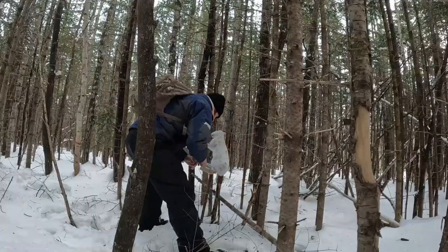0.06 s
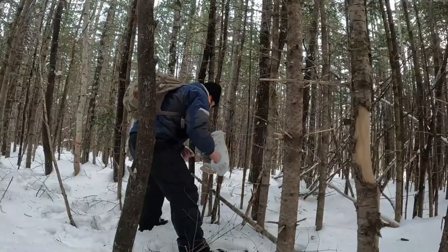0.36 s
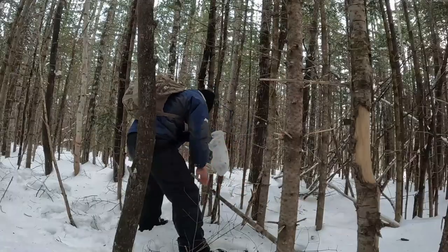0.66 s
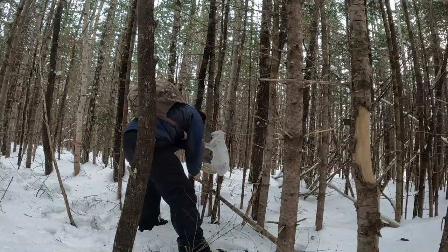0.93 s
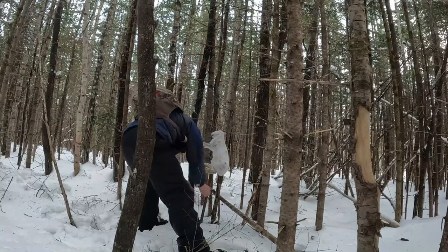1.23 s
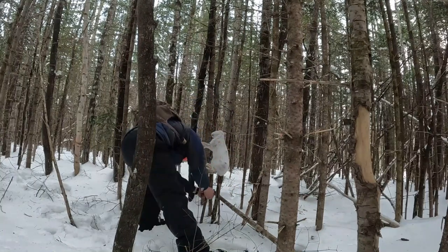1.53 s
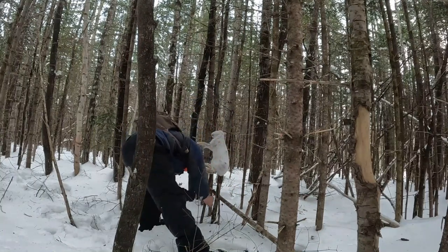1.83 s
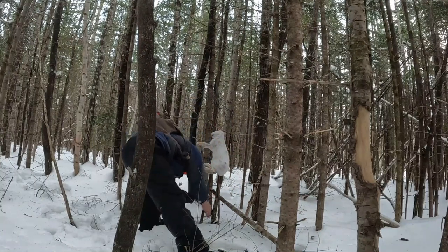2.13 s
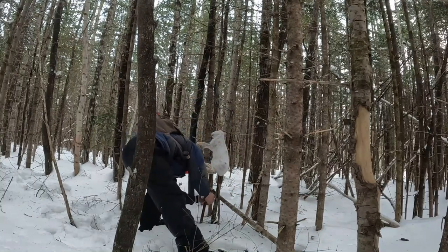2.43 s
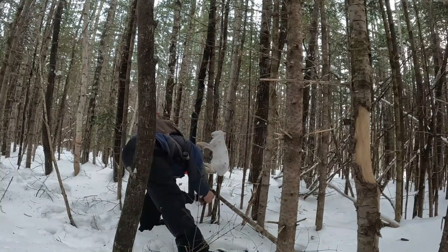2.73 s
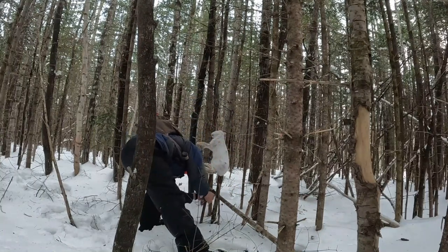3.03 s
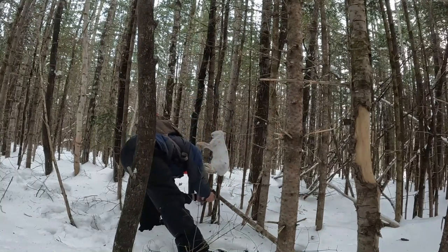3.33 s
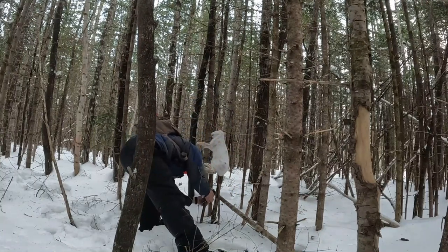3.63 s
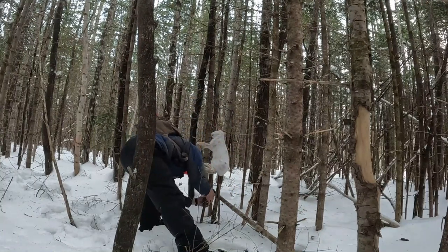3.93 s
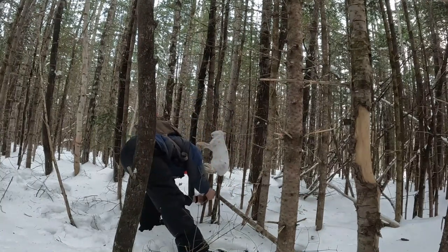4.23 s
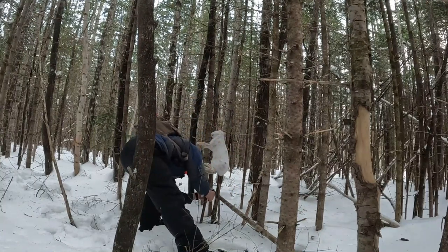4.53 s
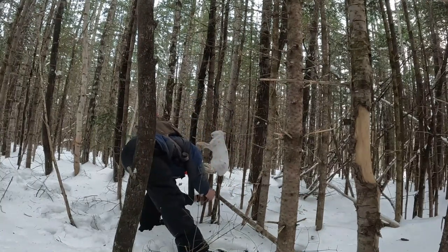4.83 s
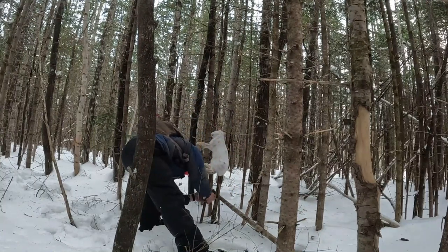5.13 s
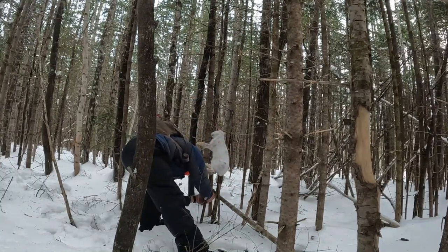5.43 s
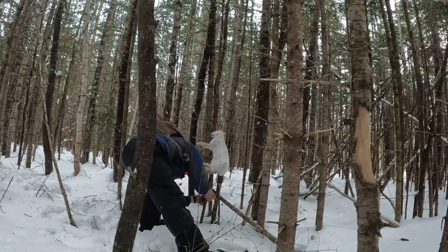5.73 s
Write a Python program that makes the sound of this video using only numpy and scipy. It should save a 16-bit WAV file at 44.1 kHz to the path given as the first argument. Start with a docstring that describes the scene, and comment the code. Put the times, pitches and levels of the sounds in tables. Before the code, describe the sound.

In quiet snowy woods, dry sticks knock lightly while sleeves rustle and boots press softly into snow. A twig then snaps, sharp and bright, echoing briefly among the trunks. Small dry ticks of wire on bark follow, with three very faint, high whistles. Near the end come another knock, more soft steps and a sudden cloth scrape. The handling sits near the centre, over a low air rumble and faint treetop hiss.

```python
"""A twig snaps sharply and echoes among the trunks as a wire snare is taken off a pole in a snowy wood.
The twig breaks fibre after fibre and sets its branch ringing. Dry sticks knock and ring, wire ticks
on bark, and countless tiny slips make sleeves rustle and snow crunch over the soft thump of boots.
Under it all lie a low rumble of moving air, a faint hiss of treetops and three thin, high whistles."""
import sys
import numpy as np
from scipy import signal
from scipy.fft import rfft, irfft, next_fast_len
from scipy.io import wavfile

SR = 44100
rng = np.random.default_rng(int(sys.argv[2]) if len(sys.argv) > 2 else 0)


def int16_out(signal):
    """Quantize to a 16-bit WAV file."""
    q = np.round(np.clip(np.atleast_2d(signal).T, -1, 1) * 32767)
    wavfile.write(sys.argv[1], SR, q.astype(np.int16))


N = 259440
TIME = np.arange(N) / SR

# how briskly the body moves, as a rustle envelope: (time [s], level [dB])
MOTION = [(0.0, -62.5), (0.44, -67.5), (0.61, -64.5), (0.74, -59.5), (0.89, -66.5), (1.18, -64.5),
          (1.51, -61), (1.72, -62), (2.16, -69.5), (2.59, -71), (3.4, -71), (3.66, -68), (4.28, -70),
          (5.17, -61.5), (5.32, -61.5), (5.82, -67)]
CALM_DB = -70   # the motion envelope when only the hands work
# weight going onto a boot: (time [s], hold [s], muffled snow [dB], deep thump [dB])
STEPS = [(0.0, 0.022, -49.5, -36.5), (0.671, 0.08, -48.5, -46), (1.361, .02, -57, -37.5),
         (1.498, 0.028, -48, -41), (1.722, 0.016, -46.5, -41), (3.659, 0.076, -56.5, -45),
         (5.113, 0.029, -45, -35.5), (5.45, .02, -52, -42.5), (5.826, .04, -47, -38)]


def from_db(db):
    """Decibels to gain."""
    return 10 ** (np.asarray(db) / 20)


def unit_rms(x):
    """Scale to rms 1."""
    return x / np.sqrt(np.mean(x ** 2) + 1e-20)


def unit_hit(x):
    """Scale a short sound to the energy of 10 ms at rms 1."""
    return x * np.sqrt(SR / 100 / np.mean(np.sum(x ** 2, axis=-1)))


def automation(points):
    """A curve of (time, value) points at every sample."""
    return np.interp(TIME, *np.transpose(points))


def add(out, s, sound):
    """Mix a short sound in at time s."""
    start = int(s * SR)
    out[:, start:start + sound.shape[-1]] += sound[..., :N - start]


def colour(x, points):
    """Minimum-phase EQ through (frequency [Hz], gain [dB]) points; 24 dB per octave skirts beyond them."""
    size = next_fast_len(x.shape[-1] + 4096, real=True)
    hz, db = np.transpose(points)
    octave, known = np.log2(np.arange(size // 2 + 1) * SR / size + 1), np.log2(hz)
    skirt_db = 24 * np.abs(octave - np.clip(octave, known[0], known[-1]))
    gain = from_db(np.interp(octave, known, db) - np.minimum(skirt_db, 60))
    cepstrum = irfft(np.log(gain), size)
    cepstrum[1:size // 2] *= 2   # folded forward, so nothing rings ahead of a hit
    cepstrum[size // 2 + 1:] = 0
    return irfft(rfft(x, size) * np.exp(rfft(cepstrum)), size)[..., :x.shape[-1]]


def band(x, low_hz, high_hz):
    """Butterworth band-pass."""
    sos = signal.butter(2, [low_hz, min(high_hz, .45 * SR)], "band", fs=SR, output="sos")
    return signal.sosfilt(sos, x)


def bell(hz, octaves):
    """EQ points of a broad resonance; the top octave is lost on the way."""
    grid_hz = np.geomspace(200, 15000, 60)
    detuning = 2 * np.log2(grid_hz / hz) / max(octaves, .1)
    top_db = np.interp(grid_hz, [7400, 8600, 11300, 15000], [2, -3.0, -0.5, -19.5])
    return np.column_stack([grid_hz, -20 * np.log10(1 + detuning ** 2) + top_db])


def widen(pair, side_db):
    """Two unrelated signals as mid and side of a stereo pair."""
    return pair[0] + from_db(side_db) * pair[1] * np.array([[1], [-1]])


def stereo_noise(size, side_db):
    """White noise, its width set by the side level."""
    return widen(rng.standard_normal((2, size)), side_db)


def drift(per_s):
    """A random wander of rms 1."""
    targets = rng.standard_normal(4096)
    return unit_rms(np.interp(TIME * per_s, np.arange(len(targets)), targets))


def decay(t, t60):
    """An envelope that falls 60 dB in t60 seconds."""
    return from_db(-60 * t / t60)


def noise_tail(t60, side_db, size=16384):
    """Stereo noise that dies away."""
    return unit_hit(stereo_noise(size, side_db) * decay(np.arange(size) / SR, t60))


def contact(spray_t60, spray_db):
    """One sharp release followed by a spray of tiny ones."""
    spray = from_db(spray_db) * noise_tail(spray_t60, side_db=-7.5)
    return spray + unit_hit(signal.unit_impulse(spray.shape[-1]))


def friction(eq, per_s, spread_db, grain_db, side_db):
    """Countless tiny slips blur into noise; a few larger ones stand out as grains."""
    sizes = from_db(spread_db * np.minimum(rng.exponential(1, (2, N)), 3.5))
    sizes *= rng.choice([-1, 1], (2, N))
    grains = unit_rms(sizes * (rng.random((2, N)) < per_s / SR))
    slips = rng.standard_normal((2, N)) + from_db(grain_db) * grains
    return unit_rms(colour(widen(slips, side_db), eq))


def air():
    """The bed: a wandering low rumble of moving air and the steady hiss of the treetops."""
    # slow swell of the rumble: (time [s], level [dB])
    swell = [(0, -52.5), (.5, -55.5), (.82, -48.5), (1.0, -56), (1.6, -49), (1.95, -60), (2.25, -51.5),
             (2.85, -55.5), (3.4, -52), (4.6, -51), (5.05, -55), (5.6, -49)]
    # deep weight of moving air: (frequency [Hz], gain [dB])
    rumble_eq = [(15, -6.5), (28, 1), (48, -0.5), (75, -1), (120, -9), (200, -22.5), (400, -43)]
    # soft hiss of the treetops: (frequency [Hz], gain [dB])
    treetop_eq = [(300, 6.5), (800, -1), (1150, 3.5), (1500, 0), (2300, -17.5), (3800, -26), (5200, -12),
                  (7400, -10.5), (8600, -13.5), (10500, -17), (12500, -13), (14500, -42)]
    rumble_db = automation(swell) + 2.1 * drift(per_s=9)
    rumble = unit_rms(colour(stereo_noise(N, side_db=-21), rumble_eq))
    hiss = unit_rms(colour(stereo_noise(N, side_db=-2.0), treetop_eq))
    return from_db(rumble_db) * rumble + from_db(-69.5) * hiss


def whistles():
    """Very high, wavering notes that rise a little as they swell and fade."""
    # thin, faint whistles: (time [s], level [dB])
    notes = [(3.45, -74), (4.41, -69), (4.85, -72)]
    length_s, start_hz, rise_hz_per_s = 0.14, 7080, 940
    out, size = np.zeros((2, N)), int(length_s * SR)
    waver_hz = 170 * drift(per_s=500)
    for s, level_db in notes:
        hz = start_hz + rise_hz_per_s * TIME[:size] + waver_hz[int(s * SR):][:size]
        tone = np.sin(2 * np.pi * np.cumsum(hz) / SR)
        add(out, s, from_db(level_db) * unit_rms(np.hanning(size) * tone))
    return out


def stir_db():
    """How far the movement rises above calm handwork."""
    return automation(MOTION) - CALM_DB


def sleeves(jerk):
    """Sleeves rub in uneven strokes that ride the body's motion."""
    # bright rustle of cloth: (frequency [Hz], gain [dB])
    sleeve_eq = [(1200, -12), (2200, 3), (3200, 0.5), (4200, -1.5), (5200, 0.5), (7400, -1.5), (8400, -11),
                 (10200, -6.5), (12500, -15.5), (14500, -23.5)]
    level_db = automation(MOTION) + 0.53 + 1.5 * jerk + 0.7 * drift(per_s=16)
    return from_db(level_db) * friction(sleeve_eq, per_s=810, spread_db=5.5, grain_db=-7, side_db=-6)


def treading(attack_s=0.015, release_s=.02):
    """Pressure on the snow as a gain: each step builds up, holds and relaxes."""
    pressure = np.zeros(N)
    for s, hold_s, snow_db, _ in STEPS:
        attack = np.clip((TIME - s) / attack_s, 0, 1)
        release = np.exp(-np.maximum(TIME - s - hold_s, 0) / release_s)
        pressure += from_db(snow_db) * attack * release
    return pressure


def snow(jerk):
    """The crust crunches and the snow packs under shuffling boots, louder with each step."""
    # midrange crunch of the crust: (frequency [Hz], gain [dB])
    crunch_eq = [(450, -3), (800, -5), (1120, 1.5), (1450, -1), (1900, -6.5), (2600, -27), (4500, -29.5)]
    # muffled packing of the snow: (frequency [Hz], gain [dB])
    packing_eq = [(70, -11), (130, 3), (190, 2.5), (270, -2.5), (360, -6), (500, -9.5), (750, -19),
                  (1300, -41.5)]
    pressure = treading()
    shuffling = from_db(-65 + 0.65 * stir_db() + 0.77 * jerk + 1.1 * drift(per_s=18))
    crunch = friction(crunch_eq, per_s=250, spread_db=6.5, grain_db=-5.0, side_db=-6.5)
    standing = from_db(-53.5 + 1.1 * drift(per_s=14))
    packing = friction(packing_eq, per_s=120, spread_db=3.5, grain_db=-8.5, side_db=-14.5)
    crunch *= np.hypot(shuffling, from_db(-11.5) * pressure)
    packing *= np.hypot(standing, pressure)
    return crunch + packing


def cloth_scrape(start_s=5.843, attack_s=0.0027):
    """A sudden scrape of stiff cloth closes the scene."""
    # broad rasp of stiff cloth: (frequency [Hz], gain [dB])
    scrape_eq = [(400, -18), (900, 5), (1400, 3.5), (2400, -0.5), (4000, 0), (7000, 1.5), (10500, -2.5),
                 (13000, -12), (15000, -23)]
    pull = np.clip((TIME - start_s) / attack_s, 0, 1)
    return from_db(-44) * pull * friction(scrape_eq, per_s=2800, spread_db=2, grain_db=0, side_db=-8.5)


def body():
    """The movement layer: sleeves and snow share the same small jerks; the scrape comes last."""
    jerk = drift(per_s=52)
    return sleeves(jerk) + snow(jerk) + cloth_scrape()


def boots(thump_hz=38, rise_s=.02):
    """The snow pack gives under a boot with a soft, deep thump, never twice at the same pitch."""
    out, t = np.zeros((2, N)), np.arange(SR // 3) / SR
    envelope = t / rise_s * np.exp(1 - t / rise_s)
    for s, _, _, thump_db in STEPS:
        hz = thump_hz * (1 + .15 * rng.uniform(-0.83, 1))
        add(out, s, from_db(thump_db) * envelope * np.sin(2 * np.pi * hz * t))
    return out


def rubs(slips_per_s=700, slip_decay_s=.0006):
    """Each rub is a swelling crowd of tiny slips."""
    # gritty rubs of wire, glove and crusted snow: (time [s], length [s], level [dB], centre [Hz])
    strokes = [(0.594, .04, -61, 6000), (0.661, .13, -57.5, 1190), (0.821, 0.07, -59.5, 1400),
               (1.421, .039, -59.5, 2480), (2.021, .11, -69, 3020), (3.501, 0.077, -65, 1700),
               (4.402, 0.058, -61, 1400), (4.687, 0.086, -64, 1290), (4.99, 0.044, -58, 2500),
               (5.171, .11, -59, 1760), (5.437, 0.072, -59, 1640)]
    out = np.zeros((2, N))
    for s, length_s, level_db, hz in strokes:
        size = int(length_s * SR)
        slips = rng.random(size) < slips_per_s / SR
        slips = slips * from_db(4 * np.minimum(rng.exponential(1, size), 3))
        slip_power = signal.lfilter([1], [1, -np.exp(-1 / (slip_decay_s * SR))], slips)
        grit = stereo_noise(size, side_db=-8.5) * np.sqrt(slip_power + 0.035)
        stroke = grit * signal.windows.tukey(size, .8)
        add(out, s, from_db(level_db) * unit_rms(colour(stroke, bell(hz, octaves=2.2))))
    return out


def faint_ticks(per_s=5, octaves=2.2, t60=.018):
    """Tiny catches come at random, stronger when the body moves; extra rows for wire()."""
    timing, strength, pitch = rng.random((64, 3)).T
    times = (np.arange(len(timing)) + timing) / per_s
    levels_db = -65.5 + .7 * np.interp(times, TIME, stir_db()) + 2.5 * (2 * strength - 1)
    centres_hz = 6000 * 2 ** (pitch - .5)
    return [(s, db, hz, octaves, t60) for s, db, hz in zip(times, levels_db, centres_hz) if s < TIME[-1]]


def wire():
    """Wire and twig ends catch on bark in small dry ticks, each ringing briefly at its own pitches."""
    # catches on bark: (time [s], level [dB], centre [Hz], width [octaves], spray t60 [s])
    ticks = [(0.196, -51, 4170, 2.6, 0.017), (0.324, -58, 5480, 3.7, .01), (0.6308, -48, 2780, 1.6, .035),
             (0.7726, -53.5, 3130, 0.75, 0.011), (1.044, -58, 6600, 3.9, .015),
             (1.1545, -61, 10600, .4, .04), (1.507, -52.5, 3000, 2.4, .05), (1.688, -52.5, 6500, 3.4, .03),
             (1.848, -47, 3700, 1.9, 0.071), (2.1, -52, 2400, 2.3, 0.076), (2.177, -57, 1960, 1.5, .06),
             (2.2826, -50.5, 3020, 1.5, 0.083), (2.328, -56.5, 4300, 1.9, .02),
             (2.3688, -52.5, 2800, 2.8, 0.049), (2.7387, -61, 4540, 1.43, 0.031),
             (3.7322, -58.5, 5500, 2.1, .012), (3.8285, -53.5, 5170, 1.6, .018),
             (3.9326, -58, 4500, 2, .06), (4.181, -57, 5730, 0.21, .02), (4.2164, -51, 5900, 1.5, 0.031),
             (4.421, -58, 2270, 1.6, 0.098), (4.4629, -49.5, 2810, 1.35, 0.059),
             (4.487, -47, 2440, 1.5, 0.082), (4.6247, -61.5, 6130, 2.3, .02),
             (4.966, -56, 10700, 0.76, .01), (5.0004, -50.5, 4130, 3.4, .02),
             (5.0121, -48, 5200, 5.4, 0.018), (5.135, -54, 3800, 1.3, .026), (5.178, -49, 3880, 2.3, .05),
             (5.3997, -59, 10100, .15, .023), (5.7, -58.5, 4630, 0.77, 0.027)]
    out, t = np.zeros((2, N)), np.arange(1024) / SR
    for s, level_db, hz, octaves, t60 in list(ticks) + faint_ticks():
        touch = contact(spray_t60=t60, spray_db=6.5)
        pitches = np.minimum(hz * 2 ** (octaves * rng.uniform(-.35, 0.44, (4, 1))), 11000)
        modes = np.sin(2 * np.pi * pitches * t).sum(axis=0) * decay(t, t60=0.026)
        click = unit_hit(colour(touch, bell(hz, octaves)))
        ring = unit_hit(signal.fftconvolve(touch, modes[None], axes=1)[:, :touch.shape[-1]])
        add(out, s, from_db(level_db) * unit_hit(click + from_db(-6.5) * ring))
    return out


def sticks():
    """Every knock rings the stick's modes anew, with a thud in the snow and a crack of bark."""
    # sticks knocking together: (time [s], wood [dB], dull thud [dB], bright crack [dB])
    knocks = [(0.5767, -39, -49, -39.5), (0.661, -45.5, -46, -53), (0.6967, -53.5, -43.5, -58),
              (0.76, -57, -42.5, -62), (0.8364, -51, -63, -66), (1.1967, -50.5, -51.5, -72),
              (1.3592, -36, -39.5, -44.5), (1.3700, -50, -39, -45), (1.521, -52.5, -62, -52.5),
              (1.527, -52, -47, -53.5), (1.5951, -40, -59, -44.5), (1.6792, -50.5, -61, -63),
              (2.0763, -58, -50.5, -69), (5.1062, -39.5, -46.5, -63), (5.1103, -41.5, -46, -52),
              (5.3099, -49, -59, -78)]
    # ring of a dry stick: (frequency [Hz], level [dB], t60 [s])
    stick_modes = [(718, -2.5, 0.013), (980, -1, 0.022), (1210, -3.5, 0.031), (1402, 3, 0.024),
                   (1637, -6, 0.024), (1861, -4.5, 0.019), (2130, -1.5, 0.023), (2440, -5.5, 0.0091),
                   (2855, -7, 0.019), (3430, -7.5, 0.011), (4340, -20.5, 0.022)]
    # bright crack of bark: (frequency [Hz], gain [dB])
    crack_eq = [(800, -12.5), (2000, 0), (4500, 3.5), (6000, -5), (7200, 0), (8500, -8), (11000, -7.5),
                (14500, -23)]
    out, t = np.zeros((2, N)), np.arange(4096) / SR
    hz, mode_db, t60 = np.transpose(stick_modes)[:, :, None]
    for s, wood_db, thud_db, crack_db in knocks:
        touch = contact(spray_t60=0.053, spray_db=-8.5)
        strengths = from_db(mode_db + rng.normal(0, 5.0, hz.shape)) * rng.choice([-1, 1], hz.shape)
        detuned_hz = hz * rng.normal(1, .015, hz.shape)
        modes = strengths * np.sin(2 * np.pi * detuned_hz * t) * decay(t, t60)
        wood = signal.fftconvolve(touch, modes.sum(axis=0)[None], axes=1)
        thud = band(contact(spray_t60=0.084, spray_db=-2.0), 170, 497)
        crack = colour(contact(spray_t60=0.021, spray_db=7.5), crack_eq)
        for level_db, layer in (wood_db, wood), (thud_db, thud), (crack_db, crack):
            add(out, s, from_db(level_db) * unit_hit(layer))
    return out


def twig():
    """A bright snap rings the branch; the trunks scatter it back, first densely, then faintly from afar."""
    # the twig breaking, fibre after fibre: (time [s], bright crack [dB], woody crack [dB])
    fibres = [(1.7209, -45, -58), (1.7293, -47.5, -33), (1.7311, -23.5, -36), (1.7340, -35, -32.5)]
    # sharp edge of the snap: (frequency [Hz], gain [dB])
    bright_eq = [(600, -17), (1500, -21.5), (3000, -11.5), (4400, 3.5), (6000, -15.5), (7800, -2),
                 (9700, 4), (12000, -1.5), (14000, -21.5), (15500, -28)]
    # woody body of the snap: (frequency [Hz], gain [dB])
    woody_eq = [(250, -13), (550, -13), (800, -9), (1100, 0), (1400, 1), (1900, 0), (2600, -2), (3600, 6),
                (4600, 0.5), (5600, -11.5), (8000, -19.5)]
    # ring of the broken branch: (frequency [Hz], level [dB], t60 [s])
    branch_modes = [(1050, -6, .06), (1380, 5.5, .07), (1878, -6, 0.24), (2174, 2.5, .09),
                    (3000, -7.5, .15), (3730, -9.5, 0.33), (3930, -6, .15), (4640, -1, .16),
                    (4740, -8, .35)]
    # tone of the echo off the trunks: (frequency [Hz], gain [dB])
    echo_eq = [(400, -12), (900, -8.5), (1900, -8.5), (2500, -7.5), (3700, -0.5), (4700, 1.5), (5600, -5.5),
               (7200, -4), (8700, -8.5), (10000, -5), (12200, -1.5), (14000, -13.5), (15500, -30.5)]
    out, t = np.zeros((2, N)), np.arange(16384) / SR
    for s, bright_db, woody_db in fibres:
        bright = unit_hit(colour(contact(spray_t60=.022, spray_db=-10), bright_eq))
        woody = unit_hit(colour(contact(spray_t60=0.023, spray_db=2.0), woody_eq))
        add(out, s, from_db(bright_db) * bright + from_db(woody_db) * woody)
    break_s = fibres[1][0]
    hz, mode_db, t60 = np.transpose(branch_modes)[:, :, None]
    modes = from_db(mode_db) * np.sin(2 * np.pi * hz * t) * decay(t, t60)
    add(out, break_s, from_db(-34) * unit_hit(modes.sum(axis=0)))
    near = from_db(-25) * noise_tail(t60=0.33, side_db=-4, size=32768)
    far = from_db(-40.5) * noise_tail(t60=1.1, side_db=-0.5, size=32768)
    add(out, break_s + .002, from_db(-29.5) * unit_hit(colour(near + far, echo_eq)))
    return out


def woods(x, wet_db=-12.0):
    """Add short, thin reflections from the trunks; the snow swallows the rest."""
    echoes = band(noise_tail(t60=0.3, side_db=-21), 570, 14100)
    echoes /= np.sqrt(np.mean(np.sum(echoes ** 2, axis=-1)))
    return x + from_db(wet_db) * signal.fftconvolve(x, echoes, axes=1)[:, :N]


def scene():
    """The work sits near the centre; the small sounds share one reverb, the snap brings its own echo."""
    return woods(sticks() + wire() + rubs() + whistles()) + twig() + body() + boots() + air()


def record(dry, cutoff_hz=15600):
    """The left microphone is a little brighter than the right; the top is cut steeply."""
    # tone of the microphone pair: (frequency [Hz], both sides [dB], left minus right [dB])
    microphone_eq = [(20, 0, 0), (2400, 0, 0.5), (5000, 0, 0), (8000, 0, 1.5), (11000, -0.5, 2.5),
                     (13500, 1, 5), (15000, -7.5, 3.5)]
    hz, both_db, lean_db = np.transpose(microphone_eq)
    left = colour(dry[0], np.column_stack([hz, both_db + lean_db / 2]))
    right = colour(dry[1], np.column_stack([hz, both_db - lean_db / 2]))
    high_cut = signal.ellip(10, .1, 80, cutoff_hz, fs=SR, output="sos")
    return signal.sosfilt(high_cut, np.array([left, right]))


dry = scene()
out = record(dry)
int16_out(out)
```